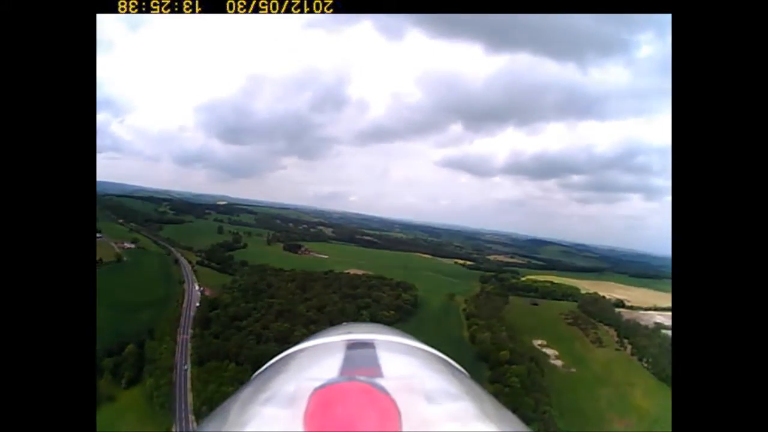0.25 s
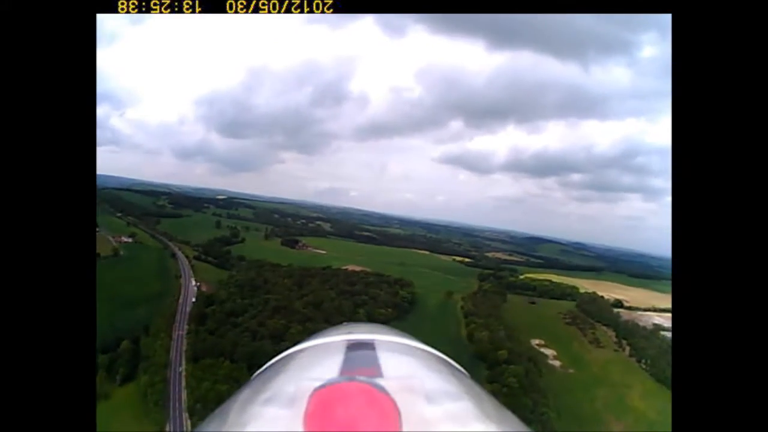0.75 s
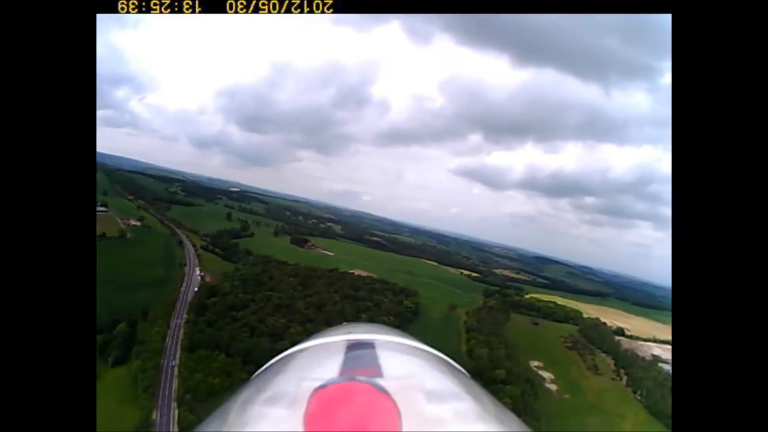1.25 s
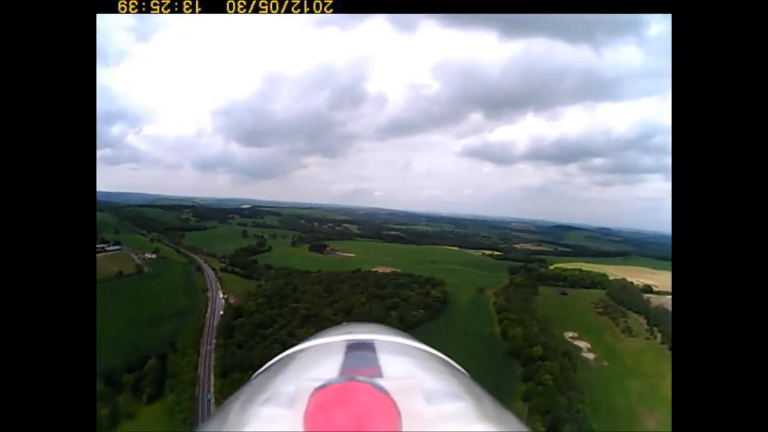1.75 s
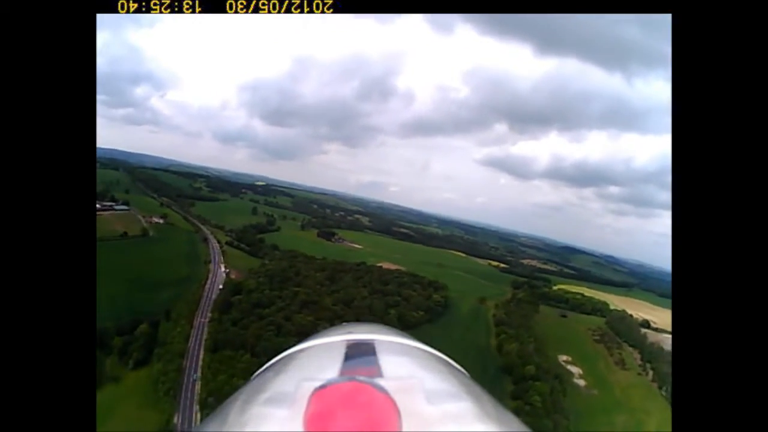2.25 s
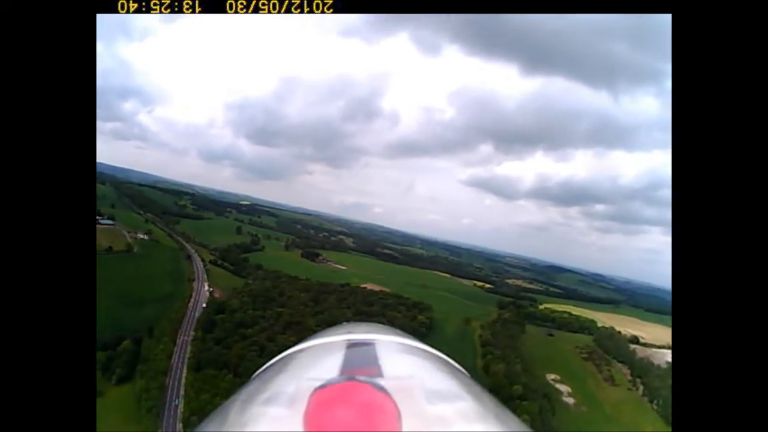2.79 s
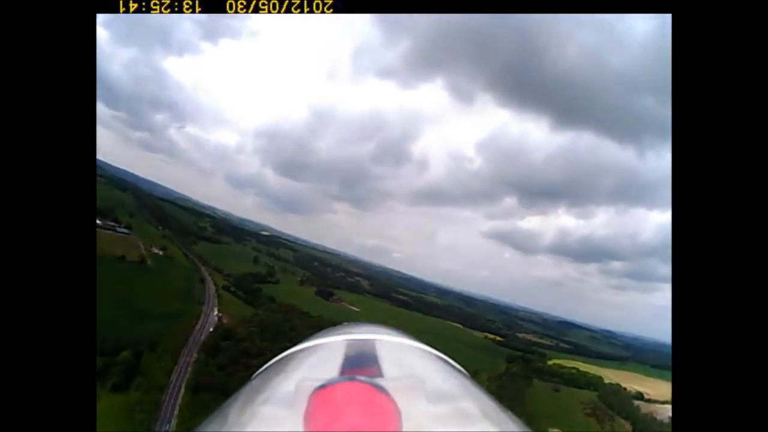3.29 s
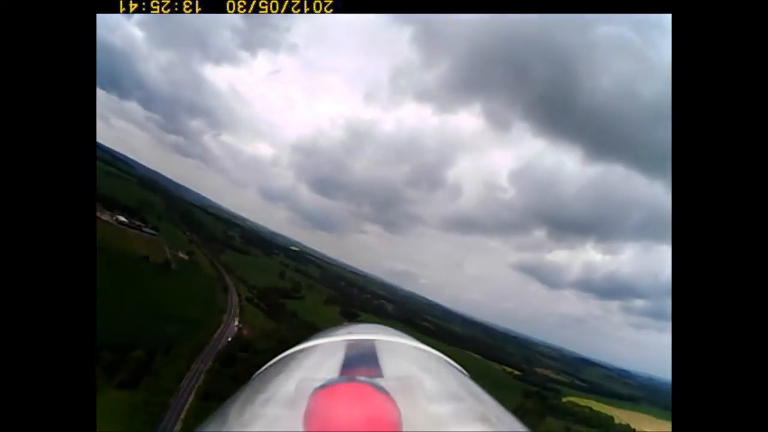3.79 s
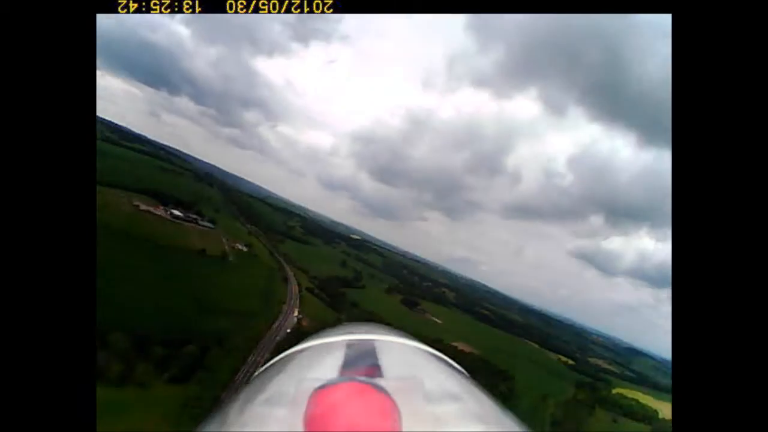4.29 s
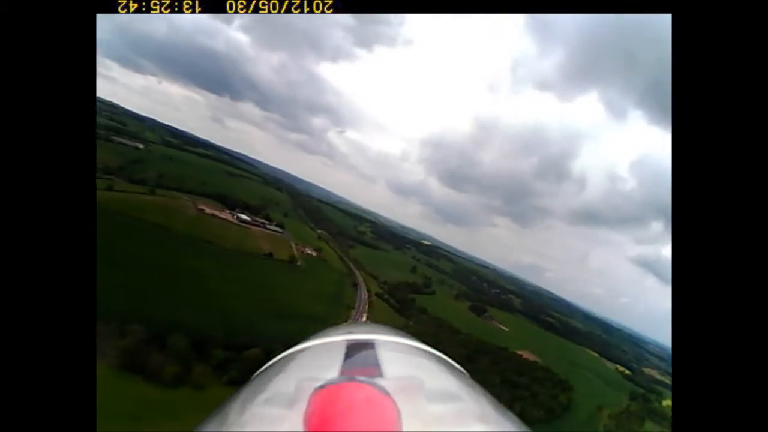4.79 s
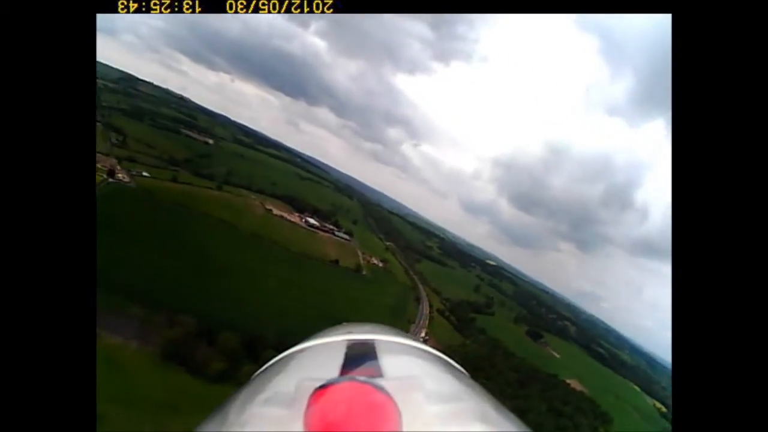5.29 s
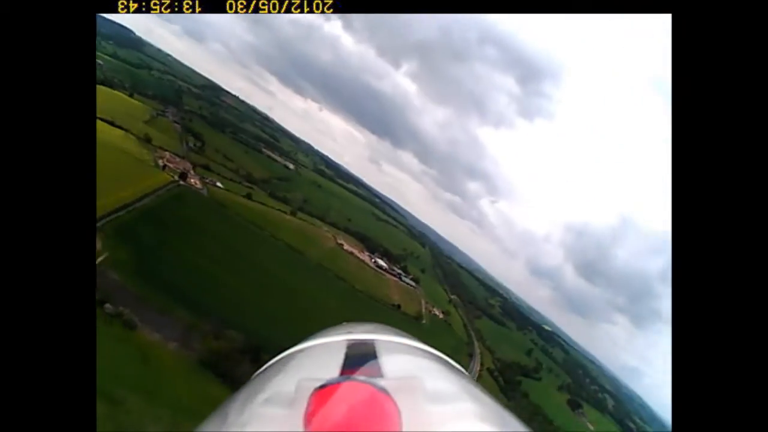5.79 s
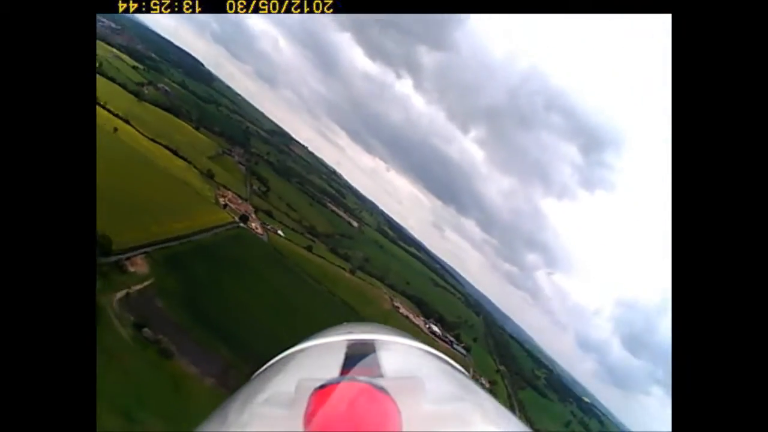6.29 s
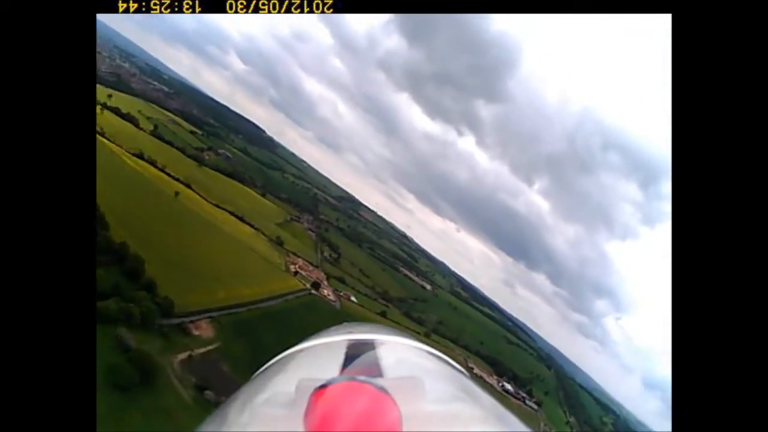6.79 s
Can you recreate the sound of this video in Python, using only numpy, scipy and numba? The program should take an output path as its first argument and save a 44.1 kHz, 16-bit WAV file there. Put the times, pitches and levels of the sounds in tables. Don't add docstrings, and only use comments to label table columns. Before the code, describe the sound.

Loud wind strikes a small, cheap microphone on a gliding model aircraft in the open air: low rumble, thick buffeting around a few hundred hertz, a rush near one kilohertz and thinner hiss above. It is nearly mono-toned and continuous, squashed by overload, with grainy digital hiss and a barely audible very high whine. From 0 to 1.5 s it roars and flutters, swelling at 0.7. Around 1.7 it dips, and a breathy note near 2.8 kHz pokes out at 1.85, weaker at 2.1. It surges from 2.5 to 3, with a click at 3.0, then eases toward 4. From 4.9 a clean whistle near 540 Hz emerges, strongest at 5.2-5.4, then breaks off to a trace by 6; a sharper click lands at 5.3. From 6.4 to 7 the air is faster, brighter and breathier, ending mid-rush.

```python
import sys
import numpy as np
from scipy import signal
from scipy.io import wavfile
from scipy.ndimage import uniform_filter1d
from numba import njit

SR = 44100
rng = np.random.default_rng(int(sys.argv[2]) if len(sys.argv) > 2 else 0)


def attenuation_scalar(level_db):
    decades = np.asarray(level_db, float) / 20
    return 10 ** decades


def wav_record(signal):
    frames = np.transpose(np.atleast_2d(signal))
    bounded = np.clip(frames, -1, 1)
    quanta = np.round(bounded * 32767).astype(np.int16)
    wavfile.write(sys.argv[1], SR, quanta)


N = 310903


def airflow():
    # frequency_hz, density_db (dB per Hz)
    rumble_colour = [(15, -16.5), (40, -9), (90, -3.5), (160, 0.5), (250, 1), (350, -9.5), (600, -43)]
    buffet_colour = [(120, -40), (230, -7), (330, 0), (450, -0.5), (600, -3), (800, -8), (1300, -27),
                     (2500, -71.5)]
    rush_colour = [(300, -41), (600, -6), (800, -3), (1050, 0), (1350, -4.5), (1700, -12), (2400, -38.5),
                   (3500, -70)]
    hiss_colour = [(900, -39.5), (1500, -6), (2050, -2), (2300, -11), (2550, -16.5), (3200, -26),
                   (5000, -45), (8000, -59.5)]

    rumble = eddies(lambda hz: read(rumble_colour, hz), patchy_db=-0.12, flicker_db=-0.84, size=2048)
    buffet = eddies(lambda hz: read(buffet_colour, hz), patchy_db=0.57, flicker_db=-0.9, size=1024)
    rush = eddies(lambda hz: read(rush_colour, hz), patchy_db=0.6, flicker_db=0.45)
    hiss = eddies(lambda hz: read(hiss_colour, hz), patchy_db=0.54, flicker_db=0.44)

    out = flow(mean_db=-18.5, per_speed=.25, per_slip=.45) * rumble
    out += flow(mean_db=-16, per_speed=.3, per_slip=1) * buffet
    out += flow(mean_db=-17.5, per_speed=.65, per_slip=.1, top_db=3.5) * rush
    out += flow(mean_db=-28, per_speed=1.05, per_slip=-.2) * hiss
    return out


def flow(mean_db, per_speed, per_slip, top_db=20):
    # time_s, change_db
    airspeed = [(0, -2.5), (.4, -3), (.7, 1.5), (1.15, 1.65), (1.55, -3.5), (1.72, -8), (2.03, -6),
                (2.3, -3), (2.57, 4.5), (3.05, 3), (3.5, -1.5), (4.0, -6.5), (4.3, -2), (5.15, -1),
                (5.3, 1.5), (6.2, 2.3), (6.42, 6), (7.05, 6)]
    # time_s, change_db
    sideslip = [(0, 5), (.7, 4.5), (1.15, 1.5), (1.58, 6), (1.73, -1.5), (2.03, -1), (2.3, 6.5),
                (2.45, -1.5), (3.4, 0), (3.7, -5.5), (4.1, -4), (4.38, -1.5), (4.7, -3.5), (5.3, -0.5),
                (5.55, -2.5), (5.92, 2), (6.1, -2), (7.05, -0.5)]
    # centre_s, half_length_s, change_db
    puffs = [(.17, .08, 2), (.42, .06, -2), (3.35, .15, 1), (3.72, .06, -2), (4.72, .08, -1.5),
             (5.15, 0.073, -2), (5.72, .06, 2.5), (6.1, .08, -1.5), (6.36, 0.037, 1), (6.7, .04, 2.5),
             (7.03, .04, 3)]

    t = np.arange(N) / SR
    speed_db = np.interp(t, *np.transpose(airspeed)) + bumps_db(puffs)
    speed_db = np.minimum(speed_db, top_db)
    slip_db = np.interp(t, *np.transpose(sideslip))
    return attenuation_scalar(mean_db + per_speed * speed_db + per_slip * slip_db)


def gusts():
    flutter = uniform_filter1d(rng.standard_normal(N), size=600)
    flutter = uniform_filter1d(flutter, size=400)
    depth_db = .6
    return attenuation_scalar(depth_db * evened(flutter))


def eddies(colour_db, patchy_db, flicker_db, size=512):
    frames = 4 * N // size + 5
    real, imaginary, patches = rng.standard_normal((frames, size // 2 + 1, 3)).T
    patches = uniform_filter1d(patches, size=5, axis=0)
    patches = evened(uniform_filter1d(patches, size=16, axis=1))
    flicker = evened(uniform_filter1d(rng.standard_normal(frames), size=5))
    hz = np.fft.rfftfreq(size, 1 / SR)
    level_db = colour_db(hz)[:, None] + patchy_db * patches + flicker_db * flicker
    spectra = (real + 1j * imaginary) * attenuation_scalar(level_db)
    noise = signal.istft(spectra, nperseg=size, noverlap=3 * size // 4)[1]
    return evened(noise[:N])


def read(points, hz):
    f, value = np.transpose(points)
    return np.interp(np.log(hz + 1), np.log(f + 1), value)


def bumps_db(rows):
    t = np.arange(N) / SR
    return sum(db * np.exp(-((t - centre) / half) ** 2) for centre, half, db in rows)


def evened(x):
    return x / np.sqrt(np.mean(x ** 2) + 1e-20)


def port():
    # centre_s, half_length_s, rise_db
    sings = [
        (1.84, 0.075, 8.5),
        (2.1, .07, 4),
        (6.45, .15, 3),
        (6.9, .3, 2),
    ]
    level = flow(mean_db=-38.5, per_speed=1.15, per_slip=-0.2) * attenuation_scalar(bumps_db(sings))
    return level * eddies(cavity_db, patchy_db=0.8, flicker_db=0.0)


def cavity_db(hz):
    # mode_hz, width_hz, level_db
    modes = [
        (2823, 240, 1.5),
        (3130, 280, -8),
    ]
    response = sum(attenuation_scalar(db) / (1 + (2 * (hz - mode_hz) / width) ** 2) for mode_hz, width, db in modes)
    return 20 * np.log10(response)


def whistle():
    # time_s, level_db
    strength = [
        (4.7, -40),
        (4.9, -27),
        (5.1, -19.5),
        (5.38, -18),
        (5.44, -30),
        (5.9, -30),
        (6.0, -40),
    ]
    lowest_s, lowest_hz, bend_hz_per_s2 = 5.27, 536, 150

    t = np.arange(N) / SR
    hz = lowest_hz + bend_hz_per_s2 * (t - lowest_s) ** 2
    waver = uniform_filter1d(rng.standard_normal((2, N)), size=2000)
    waver = evened(uniform_filter1d(waver, size=2000))
    pitch_waver_hz, level_waver_db = waver
    phase = 2 * np.pi * np.cumsum(hz + pitch_waver_hz) / SR
    level_db = np.interp(t, *np.transpose(strength), left=-99, right=-99) + level_waver_db
    octave = attenuation_scalar(-12.5) * np.sin(2 * phase)
    return np.sqrt(2) * attenuation_scalar(level_db) * (np.sin(phase) + octave)


def scene():
    air = airflow() + attenuation_scalar(-0.65) * port()
    return (gusts() * air + whistle())[None]


def overloaded(x, up, down):
    power = uniform_filter1d(x ** 2, size=8000)
    bias = -.033 + .3 * power
    ceiling = .5
    slow = signal.resample_poly(attenuation_scalar(0.58) * x + bias, up, down)
    return np.clip(slow, -ceiling, ceiling)


@njit
def slope_rounded(x, moves, growth):
    out, last, step = np.empty(len(x)), 0., 1e-3
    for i in range(len(x)):
        code = min(int(4 * abs(x[i] - last) / step), 7)
        last += np.sign(x[i] - last) * (code + .5) * step / 4
        step = max(step * growth ** moves[code], 1e-4)
        out[i] = last
    return out


def spliced(x, rate):
    # time_s, jump_half_height (full scale 1)
    splices = [
        (3.0056, -.2),
        (5.3284, .35),
    ]
    t = np.arange(len(x)) / rate
    for s, height in splices:
        near = np.exp(-((t - s) / .0008) ** 2)
        x = (1 - near) * x + near * height * np.sign(t - s)
    return x


def electronic_whine():
    # pitch_hz, level_db
    clock = [
        (7757, -69.5),
    ]
    t = np.arange(N) / SR
    return sum(np.sqrt(2) * attenuation_scalar(db - 2) * np.sin(2 * np.pi * hz * t) for hz, db in clock)


def low_pass(x):
    return signal.sosfilt(signal.butter(12, 8600, fs=SR, output="sos"), x)


def record(dry):
    up, down = 160, 441
    flattened = overloaded(dry[0], up, down)

    moves, growth = np.array([-1., -1, -1, -1, 2, 4, 6, 8]), 1.1
    grit = slope_rounded(flattened, moves, growth) - flattened
    gritty = spliced(flattened + attenuation_scalar(-1.5) * grit, SR * up / down)

    edge = signal.firwin(23001, 7725, window=("kaiser", 9), fs=SR * up)
    out = signal.resample_poly(gritty, down, up, window=edge)[:N] + electronic_whine()
    steep = signal.firwin(2401, 8290, window=("kaiser", 9), fs=SR)
    mix = signal.oaconvolve(out, steep, "same")[None]
    return low_pass(mix)


dry = scene()
out = record(dry)
wav_record(out)
```